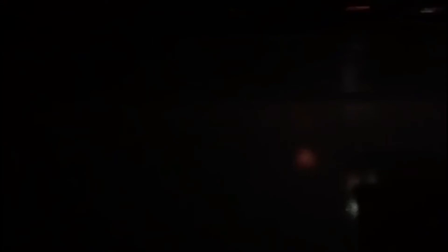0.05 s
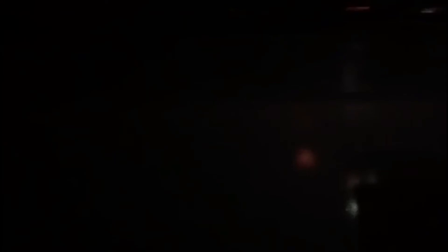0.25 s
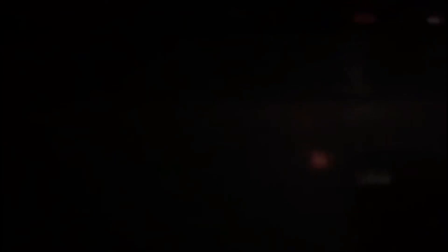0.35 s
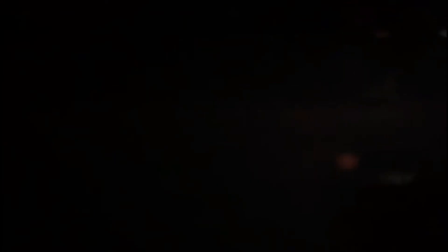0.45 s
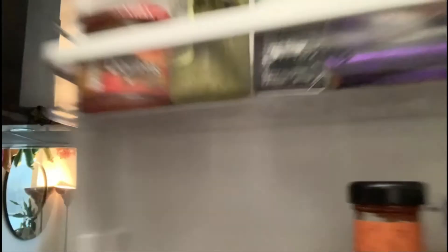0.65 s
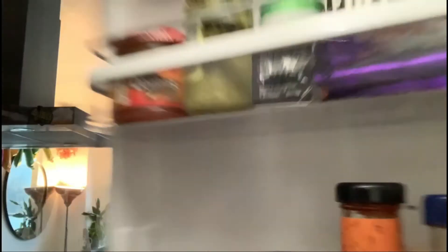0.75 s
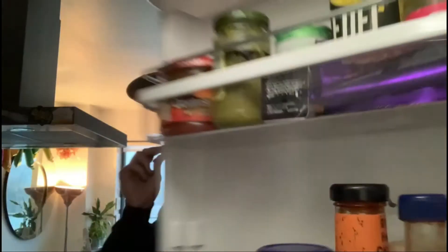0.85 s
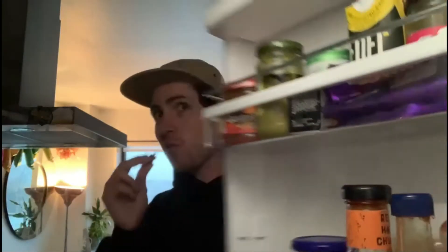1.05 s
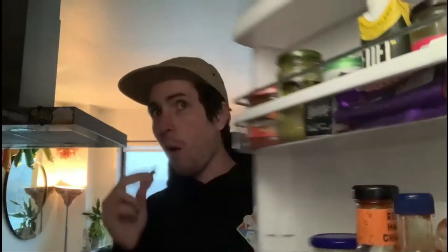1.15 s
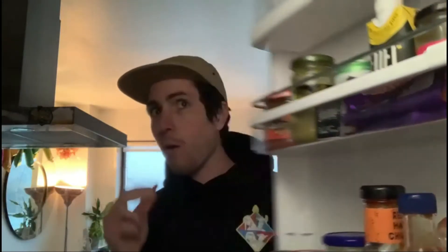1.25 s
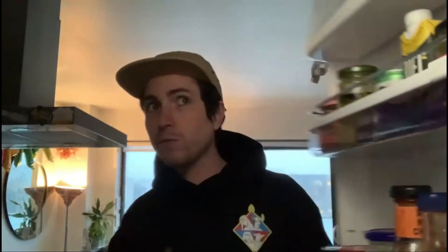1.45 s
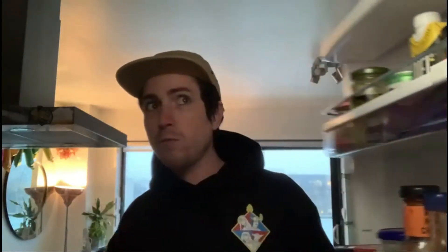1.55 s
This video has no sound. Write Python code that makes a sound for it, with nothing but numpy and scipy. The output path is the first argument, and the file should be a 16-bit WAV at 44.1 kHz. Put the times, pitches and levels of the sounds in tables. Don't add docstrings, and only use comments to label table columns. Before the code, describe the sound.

A refrigerator door opens, heard very close from inside the boxy cabinet. A low compressor hum runs throughout. Faint rubber creaks at 0.1 to 0.2 seconds lead to two loud seal cracks near 0.22 and 0.25, with a deep boom. Softer thuds shudder on to 0.9, a brief hinge squeak and faint airy whistle come around 0.35 to 0.6, then light jar ticks near 0.84 and 1.2 over thinner hum.

```python
import sys
import numpy as np
from scipy import signal
from scipy.fft import rfft, irfft, next_fast_len
from scipy.io import wavfile
from scipy.ndimage import uniform_filter1d

SR = 44100
rng = np.random.default_rng(int(sys.argv[2]) if len(sys.argv) > 2 else 0)


def linear_from_db(decibels):
    return 10 ** (np.asarray(decibels, float) / 20)


def generate_wav(sig):
    pcm = np.round(np.clip(np.atleast_2d(sig).T, -1, 1) * 32767).astype(np.int16)
    wavfile.write(sys.argv[1], SR, pcm)


N = 70560
T = np.arange(N) / SR

# (time [s], peak level [dB], length [s],
# brightness [dB/octave], favoured pitch [Hz])
CRACKS = [(.001, -34.5, 0.0019, 1, 2800), (.101, -64.5, .02, 11, 4960), (0.116, -50, 0.015, 11, 5170),
          (0.138, -43, 0.0057, 10.5, 5000), (0.165, -43.5, .01, 2, 1040), (0.181, -28.5, 0.042, 1.5, 918),
          (0.206, -39, 0.0078, 8.5, 2520), (0.2144, -14, 0.0041, 5, 2500), (0.2157, -10.5, 0.007, 3, 1620),
          (0.227, -18, 0.012, 5.5, 1020), (0.23, -16.5, 0.01, 2.5, 1130), (0.2451, -9.5, 0.0069, -1, 2240),
          (0.2486, -17, 0.0031, 2, 1620), (0.262, -20.5, 0.0038, -3, 1330), (0.268, -25, 0.0033, -7, 864),
          (0.273, -47, 0.049, -13.5, 1345), (0.493, -52, .005, 5, 4100), (0.532, -52, 0.0057, 3.5, 4200),
          (0.624, -43, 0.05, 5, 1220), (0.669, -45.5, 0.11, 5, 1860), (0.827, -52.5, 0.03, -3, 1074),
          (0.843, -32, 0.0039, 4, 4500), (0.844, -41, 0.011, 0, 1340), (0.849, -41, 0.11, 1, 1570),
          (1.172, -50, 0.14, 3.2, 2570), (1.196, -40, 0.0048, 5.5, 1130), (1.24, -44, 0.022, 7, 3050),
          (1.478, -52.5, 0.032, 3, 960)]
# (pitch [Hz], level [dB], time to fall 60 dB [s])
LINER = [(490, -7.5, 0.02), (760, -5.5, 0.013), (1020, -2.5, 0.017), (1130, -3, 0.0087),
         (1450, -12.5, 0.011), (1620, -4, 0.0037), (2077, -3.5, 0.0083), (2550, -16, 0.0092),
         (3300, -14, 0.004), (4080, -16, 0.003), (4995, -26, 0.027), (6040, -17, 0.0063),
         (8750, -13.5, 0.0036), (11000, -20.5, 0.0019)]
# (time [s], peak level [dB], pitch [Hz], time to peak [s])
KNOCKS = [(.119, -50, 1020, 0.0019), (.139, -45, 720, .002), (.119, -55.5, 5170, .002),
          (.1395, -51.5, 5026, 0.0016), (.183, -39.5, 1010, 0.0013), (.2160, -18, 1620, 0.0026),
          (.219, -24.5, 988, 0.0047), (.231, -21, 1130, 0.0035), (.225, -29.5, 189.8, .01),
          (.243, -25.5, 193.3, 0.007), (.2462, -15.5, 2257, 0.0017), (.2475, -14, 1020, 0.0027),
          (.2465, -22, 1730, 0.003), (.256, -31, 1620, 0.0035), (.248, -21, 1296, 0.0022),
          (.264, -25, 813, 0.0016), (.281, -39, 1390, 0.0036), (.30, -38.5, 792, 0.0059),
          (.33, -51, 997, 0.019), (.675, -47, 151, 0.019), (.8425, -38.5, 2370, 0.00082),
          (.8425, -47.5, 3780, 0.00082), (.844, -40.5, 833, 0.0025), (.883, -52, 1440, 0.0013),
          (1.193, -47, 1130, 0.0036), (1.248, -48, 980, .003)]
# (time [s], peak level [dB], second panel [dB re boom], shelf [dB re boom])
THUDS = [(0.167, -33, -11.5, -4), (0.186, -25, -9, 2.5), (0.2262, -9.5, -1.5, -42.5), (.232, -31, -9, 12),
         (0.2456, -7.5, -44.5, -9.5), (.279, -14, 3, -19), (0.348, -41, 15, 0.5), (0.367, -29, 3.5, -12),
         (0.388, -34, 0, -19), (0.409, -23, -26.5, -17.5), (0.451, -19.5, -17, -23),
         (0.467, -30.5, -26.5, -26), (0.508, -29, 4.5, -13.5), (0.528, -16.5, -17.5, -43),
         (0.551, -20.5, -20, -40.5), (.594, -21.5, -4, -24.5), (0.637, -21.5, -9.5, -33.5),
         (0.733, -22, -24, -41.5), (0.783, -32, -1.5, -34), (0.8765, -29, 0.5, -35),
         (1.1815, -32, -30, -29)]
# (pitch [Hz], time to fall 60 dB [s], softness of the push [Hz])
BODY = [
    (58.3, 0.14, 82),
    (116.4, 0.067, 260),
    (272.6, 0.12, 1300),
]
# (time [s], pitch [Hz], level [dB], level one octave up [dB])
SQUEAK = [
    (0.355, 824, -53.5, -62),
    (.368, 825, -36.5, -50),
    (.381, 841, -33.5, -39.5),
    (0.393, 850, -38.5, -47.5),
    (0.425, 861, -32.5, -39.5),
    (.434, 846.5, -31, -57),
    (0.446, 863, -35, -36),
    (.472, 874, -42, -51),
    (.514, 858, -51.5, -93),
]
# (multiple of pitch, level [dB], growth with squeak level [dB/dB])
SQUEAK_TONES = [(3, -14, 0.89), (4, -12, 2), (5, -27, 2.3), (6, -39.5, 1.9), (7, -24, 1.9)]
# (time [s], left minus right [dB])
SQUEAK_PAN = [(.35, -1), (.46, 1.5), (.51, 0)]
# (time [s], pitch [Hz], level [dB])
WHINE = [
    (.40, 1300, -87.5),
    (.46, 1348, -62.5),
    (.54, 1463, -49.5),
    (.60, 1620, -69),
]
# (time [s], level [dB], tilt [dB/octave])
AIR = [(0, -64, -5), (.09, -60.5, -6.5), (.15, -53.5, 0), (.3, -56.5, -14), (.38, -53, -7.5),
       (.5, -53.5, -3), (.6, -53, -3), (.67, -62, 4), (.78, -55.5, -0.4), (.9, -51, -1), (1.0, -55.5, -2),
       (1.15, -57.5, 0.3), (1.26, -58.5, -2), (1.36, -59.5, -1), (1.6, -58, -5)]
# (pitch [Hz], level [dB per Hz])
AIR_COLOUR = [(290, -35.5), (500, 0.5), (635, 1.5), (726, -24), (910, -3), (2280, -8.5), (3170, -20),
              (4300, -10), (6200, -17.5), (12000, -41.5), (15600, -81), (22000, -120)]
# (pitch [Hz], level [dB per Hz])
RUMBLE = [(15, -32), (25, -25), (54, 5.5), (141, -13.5), (253, -15), (316, -12.5), (418, -13.5),
          (522, -33.5), (700, -19.5), (910, -60.5), (1540, -120)]
# (pitch [Hz], level with door open [dB rms], extra with door shut [dB])
HUM = [(49.3, -46.5, 12), (100.9, -52, 10.5), (103.3, -55.5, 11), (147.8, -53.5, -8), (197.2, -59, 3),
       (254.4, -89.5, 14.5), (303, -55.5, -4), (420.4, -61.5, -1.5)]
# (pitch [Hz], lead of the left [radians])
PORT_PHASE = [(0, 0), (180, -.3), (300, -1.1), (530, -3.1), (790, -1.0), (1850, -1.9), (2200, -4.8),
              (4000, -6.3), (6500, -9.4), (9500, -9.4), (10600, -12.5)]
# (time [s], level [dB])
COMMON_GAP = [(.1, -5.5), (.21, -10.5), (.215, -32), (1.18, -22.5), (1.26, -10), (1.29, -32)]

DOOR_PAN_DB, BACKGROUND_PAN_DB = 1.5, 0.73
RUMBLE_DB = -47
OPPOSITE = np.array([[1], [-1]])


def rms_one(x):
    return x / np.sqrt(np.mean(x ** 2) + 1e-20)


def in_time(rows):
    s, *columns = np.transpose(rows)
    return [np.interp(T, s, column) for column in columns]


def drift(rate_hz):
    r = np.exp(-80 * np.pi * rate_hz / SR)
    slow = signal.lfilter([1], [1, -2 * r, r * r], rng.standard_normal(N // 40 + 2002))
    slow = slow[2000:]
    return np.interp(np.arange(N) / 40, np.arange(len(slow)), rms_one(slow))


def ring(clicks, hz, t60):
    r = np.exp(-np.log(1000) / (t60 * SR))
    w = 2 * np.pi * hz / SR
    return signal.lfilter([0, np.sin(w)], [1, -2 * r * np.cos(w), r * r], clicks + 1e-18)


def cracks():
    snaps_per_s, snap_spread_db = 11000, 2.2
    rise_s, tail_db, tail_s = 0.001, -27, 0.09
    favour_db, favour_octaves = 7, 0.3
    born = rng.random(N) < snaps_per_s / SR
    out = 0
    for hz, level_db, t60 in LINER:
        snap_height = linear_from_db(snap_spread_db * np.minimum(rng.exponential(1, N), 4))
        snaps = born * snap_height * rng.choice([-1, 1], N)
        force = np.zeros(N)
        for s, db, length, bright_db, favoured_hz in CRACKS:
            span = slice(int(s * SR), int(s * SR) + SR // 4)
            age = np.maximum(T[span] - s, 0)
            burst = np.exp(-(age / length) ** 2)
            tail = linear_from_db(tail_db) * np.exp(-np.log(1000) * age / tail_s / 2)
            rise = 1 - np.exp(-age / rise_s)
            octaves_away = np.log2(hz / favoured_hz)
            favour = favour_db * np.exp(-(octaves_away / favour_octaves) ** 2)
            force[span] += rise * (burst + tail) * linear_from_db(db + favour + bright_db * np.log2(hz / 1500))
        out = out + ring(snaps * force * linear_from_db(level_db - 23.5), hz, t60)
    return out


def knocks():
    s, db, hz, rise_s = np.transpose(KNOCKS)[:, :, None]
    age = np.maximum(T - s, 0)
    swell = age / rise_s * np.exp(1 - age / rise_s)
    return (linear_from_db(db) * swell * np.sin(2 * np.pi * hz * age)).sum(0)


def thuds():
    s, db, *shares = np.transpose(THUDS)
    parts = []
    for (hz, t60, soft_hz), share_db in zip(BODY, [0 * s] + shares):
        clicks = np.zeros(N)
        clicks[(s * SR).astype(int)] = linear_from_db(db + share_db)
        soften = signal.butter(2, soft_hz, fs=SR, output="sos")
        parts.append(signal.sosfilt(soften, ring(clicks, hz, t60)))
    cabinet_boom, panel, shelf = parts
    return cabinet_boom + panel, shelf


def squeak():
    hz, db, octave_db = in_time(SQUEAK)
    turn = 2 * np.pi * np.cumsum(hz * (1 + 0.0035 * drift(40))) / SR
    to_edge_s = np.minimum(T - SQUEAK[0][0], SQUEAK[-1][0] - T)
    alive = np.clip(to_edge_s / 0.002, 0, 1)
    effort_db = uniform_filter1d(db - db.max(), size=900)
    effort_db = effort_db - 180 * np.maximum(0.40 - T, 0) - 570 * np.maximum(T - 0.455, 0)
    tone = linear_from_db(db) * np.sin(turn) + linear_from_db(octave_db) * np.sin(2 * turn)
    for multiple, rel_db, growth in SQUEAK_TONES:
        level_db = -44 + rel_db + growth * effort_db + 4.5 * drift(34)
        tone = tone + linear_from_db(level_db) * np.sin(multiple * turn)
    return np.sqrt(2) * alive * tone


def whine():
    hz, db = in_time(WHINE)
    alive = (T > WHINE[0][0]) & (T < WHINE[-1][0])
    level = linear_from_db(db + 1.5 * drift(42))
    turn = 2 * np.pi * np.cumsum(hz * (1 + 0.005 * drift(60))) / SR
    return alive * level * np.sin(turn)


def banded_noise(spectrum, patchy_db, bright_db=0):
    hz, db = np.transpose(spectrum)
    together = drift(2.9)
    edges = 25 * 2 ** np.arange(0, 9.1, 0.5)
    white = rng.standard_normal((2, 2, N))
    out = 0
    for k, (low, high) in enumerate(zip(edges, edges[1:])):
        band_filter = signal.butter(2, [low, high], "band", fs=SR, output="sos")
        band = signal.sosfilt(band_filter, white[k % 2])
        level_db = np.interp(np.log(low * high) / 2, np.log(hz), db, left=-70, right=-70)
        level_db = level_db + bright_db * np.log2(low / 1000)
        flicker_db = patchy_db * (0.56 * together + 1.7 * drift(10.9))
        out = out + linear_from_db(level_db + flicker_db) * band
    return rms_one(out)


def air_rush():
    air_db, bright_db = in_time(AIR)
    air = banded_noise(AIR_COLOUR, patchy_db=2.0, bright_db=bright_db)
    all_around = linear_from_db(-6) * air[::-1]
    return linear_from_db(air_db) * (ports(air[0], PORT_PHASE, BACKGROUND_PAN_DB) + all_around)


def hum():
    open_at_s, open_takes_s, buzz_ends_s = 0.66, 0.33, 1.13
    shut = np.clip((open_at_s - T) / open_takes_s + 0.5, 0, 1)
    buzz_over = np.clip(20 * (T - buzz_ends_s), 0, 1)
    out = 0
    for hz, db, shut_db in HUM:
        buzz_db = -9 * (280 < hz < 320) * buzz_over
        level_db = db + shut_db * shut + buzz_db + 3.5 * drift(6.1)
        out = out + linear_from_db(level_db) * np.sin(2 * np.pi * (hz * T + rng.random()))
    return np.sqrt(2) * out


def ports(x, phase, pan_db=0):
    size = next_fast_len(N + 2048)
    hz = np.arange(size // 2 + 1) * SR / size
    turn = np.exp(0.5j * np.interp(hz, *np.transpose(phase)))
    spectrum = rfft(x, size)
    left = irfft(spectrum * turn, size)[:N] * linear_from_db(pan_db / 2)
    right = irfft(spectrum / turn, size)[:N] * linear_from_db(-pan_db / 2)
    return np.array([left, right])


def cabinet(x):
    t60 = 0.042
    size = next_fast_len(N + SR // 2)
    w = 2 * np.pi * np.arange(size // 2 + 1) / size
    spectrum = rfft(x, size)
    signs = [[1], [-1], [1], [-1], [1], [-1]]
    out = []
    for lags in rng.uniform(0.002, 0.011, (2, 6)) * SR:
        lags = lags[:, None]
        bounce = np.exp(-1j * w * lags) * linear_from_db(-60 * lags / SR / t60)
        echoes = (bounce / (1 - bounce) * signs).sum(0)
        out.append(irfft(spectrum * echoes, size)[:N])
    return np.array(out)


def scene():
    boom, shelf = thuds()
    boom = boom + linear_from_db(-34) * np.roll(boom, SR // 200) * OPPOSITE
    door = cracks() + knocks()
    hinge = squeak()
    air = air_rush()
    rumble = linear_from_db(RUMBLE_DB) * banded_noise(RUMBLE, patchy_db=1.2)
    behind = ports(hum() + rumble[0] + shelf + whine(), PORT_PHASE, BACKGROUND_PAN_DB)
    behind = behind + linear_from_db(-16.5) * rumble[1] * OPPOSITE
    echoes = linear_from_db(-4) * cabinet(door + shelf + linear_from_db(-9.5) * hinge)
    echoes = echoes * linear_from_db(OPPOSITE * DOOR_PAN_DB / 2)
    door = ports(door, PORT_PHASE, DOOR_PAN_DB)
    hinge = ports(hinge, PORT_PHASE, in_time(SQUEAK_PAN)[0])
    return boom + door + hinge + echoes + air + behind


def low_pass(x):
    return signal.sosfilt(signal.butter(12, 12350, fs=SR, output="sos"), x)


def record(dry):
    overload = 0.9
    dry = overload * np.tanh(dry / overload)
    mid, side = (dry[0] + dry[1]) / 2, (dry[0] - dry[1]) / 2
    gap = signal.butter(6, (6900, 9700), "bandstop", fs=SR, output="sos")
    kept = signal.sosfiltfilt(gap, mid)
    mid = kept + linear_from_db(in_time(COMMON_GAP)[0]) * (mid - kept)
    hollow = signal.butter(2, (429, 630), "band", fs=SR, output="sos")
    mid = mid - (1 - linear_from_db(-2.5)) * signal.sosfiltfilt(hollow, mid)
    side_band = signal.butter(3, (45, 11000), "band", fs=SR, output="sos")
    side = signal.sosfiltfilt(side_band, side)
    band = signal.butter(4, (30, 11700), "band", fs=SR, output="sos")
    mix = signal.sosfiltfilt(band, np.array([mid + side, mid - side]))
    return low_pass(mix)


dry = scene()
out = record(dry)
generate_wav(out)
```